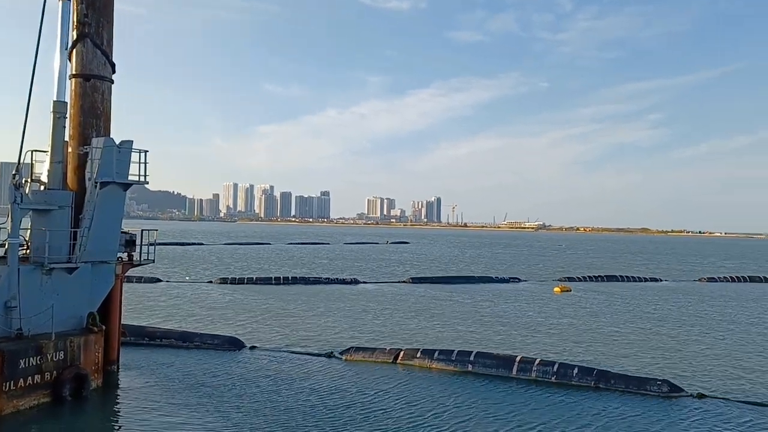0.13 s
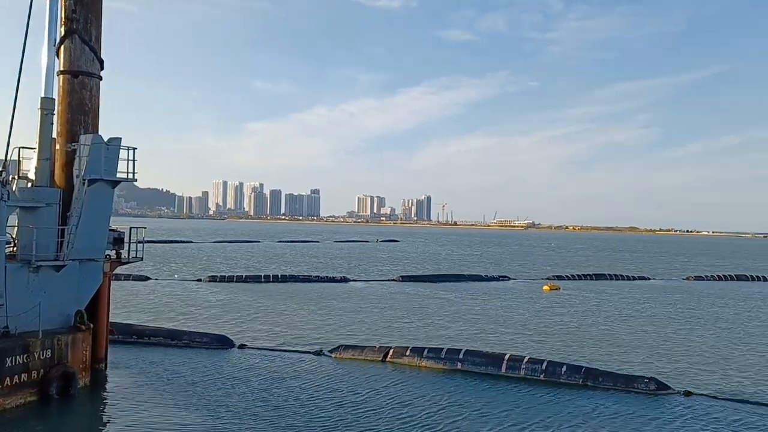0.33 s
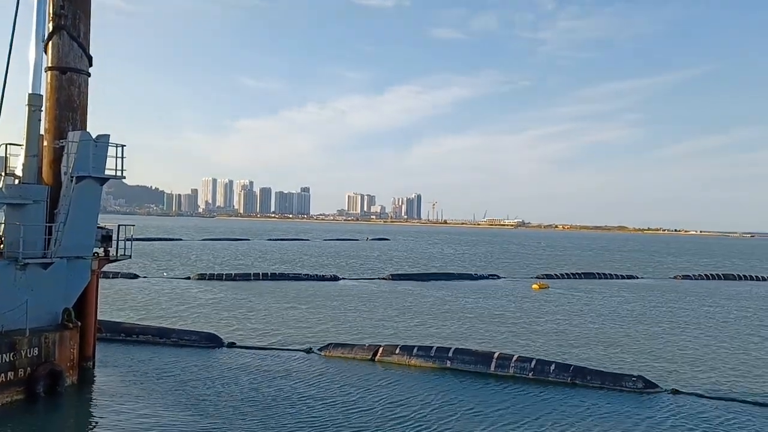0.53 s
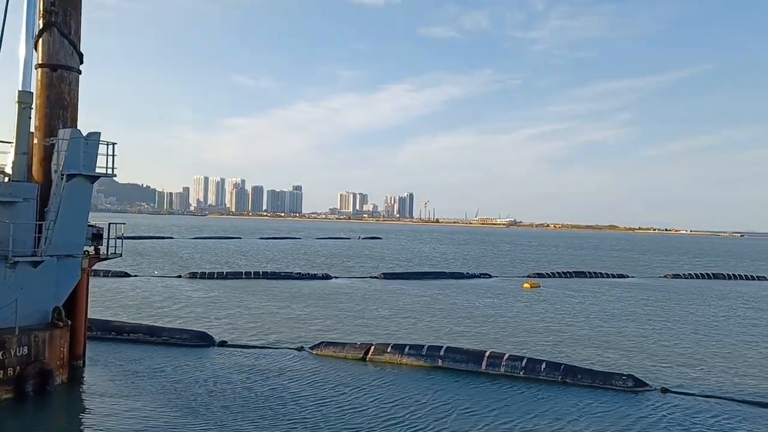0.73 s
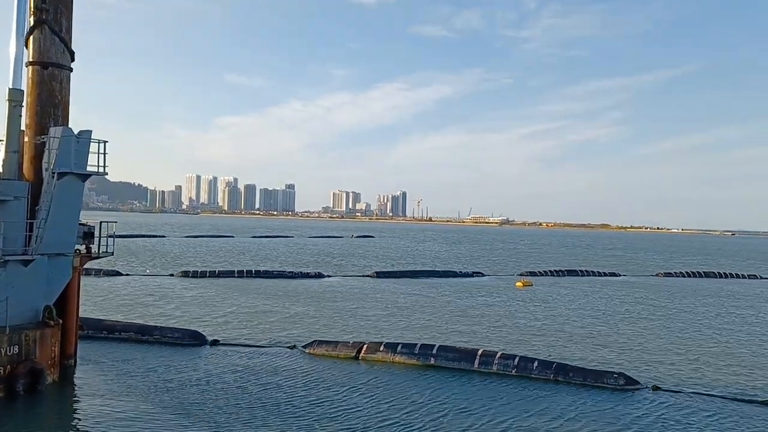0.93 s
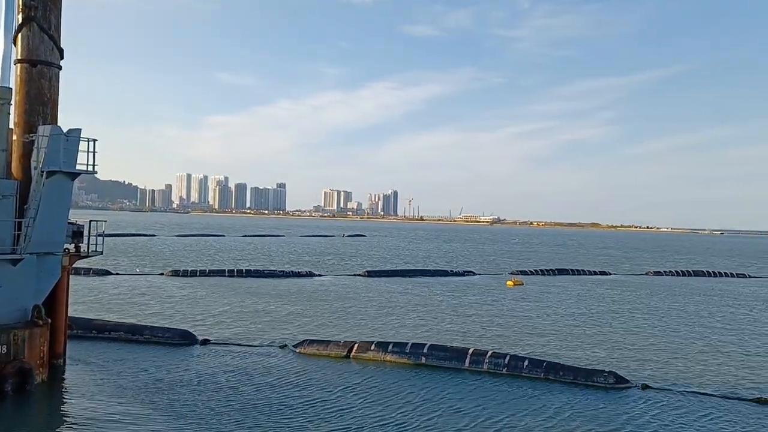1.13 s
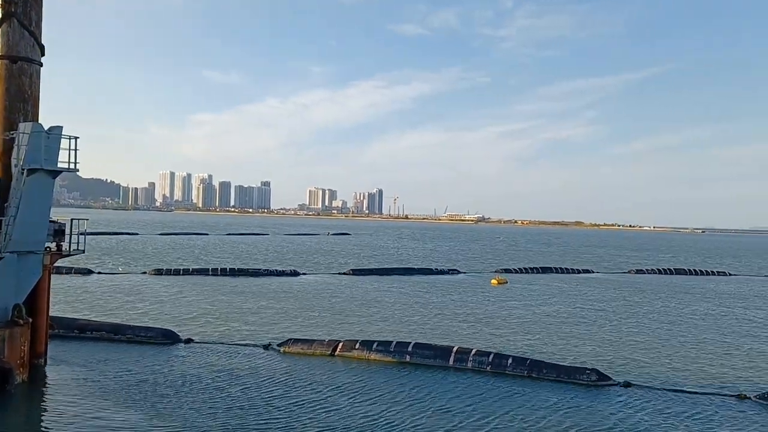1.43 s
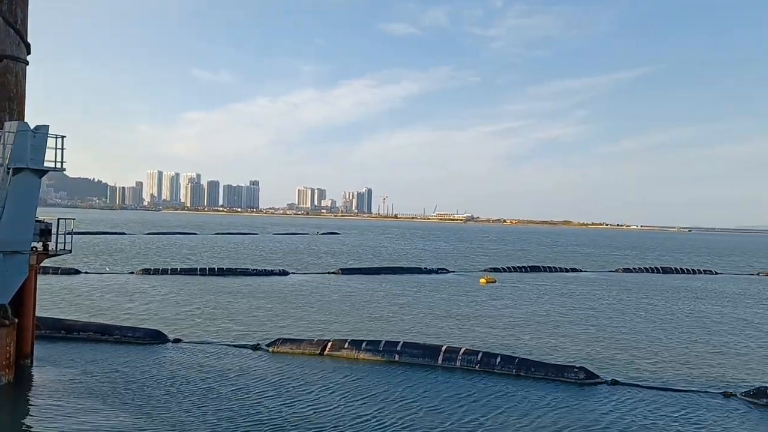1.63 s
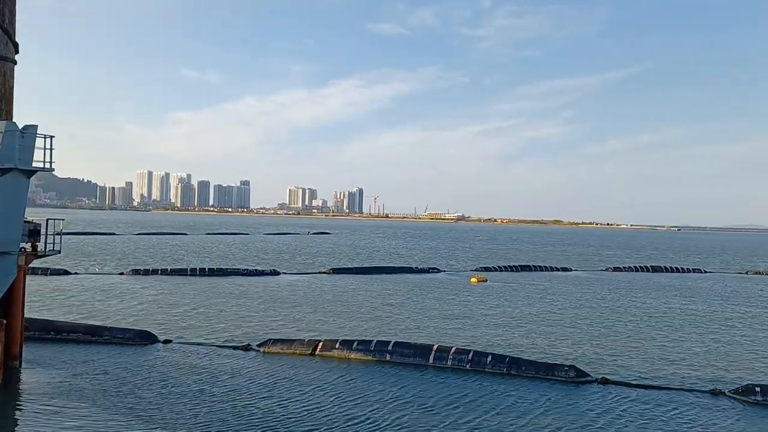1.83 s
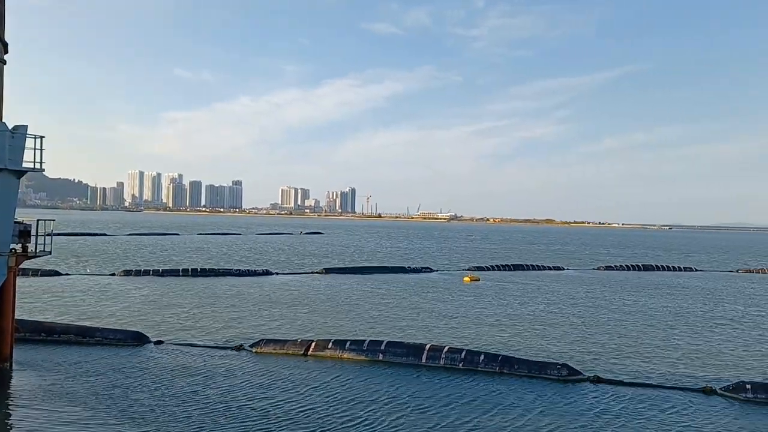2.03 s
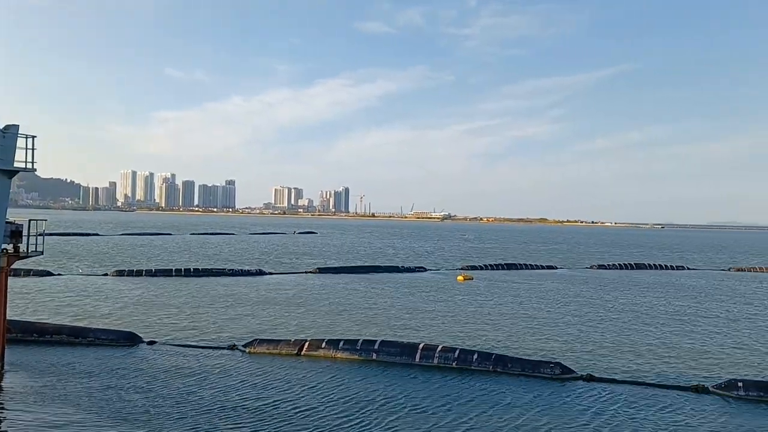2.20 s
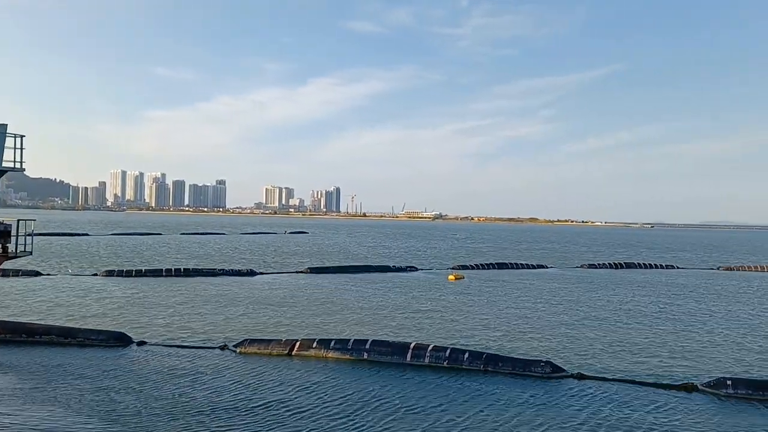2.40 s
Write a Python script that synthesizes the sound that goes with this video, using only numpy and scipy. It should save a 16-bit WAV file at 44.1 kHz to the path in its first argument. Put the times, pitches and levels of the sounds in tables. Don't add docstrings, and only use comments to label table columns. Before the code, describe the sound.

Deep diesel rumble from a dredging vessel runs throughout, with steady pump hums, dull hull drone and soft fan roar; faint water slaps and light wind buffeting join outdoors as the stereo microphone turns away and it fades.

```python
import sys
import numpy as np
from scipy import signal
from scipy.fft import rfft, irfft, next_fast_len
from scipy.io import wavfile
from scipy.ndimage import uniform_filter1d, map_coordinates

SR = 44100
rng = np.random.default_rng(int(sys.argv[2]) if len(sys.argv) > 2 else 0)


def persist_wave(psi):
    counts = np.round(np.clip(psi, -1, 1) * 32767).astype(np.int16)
    wavfile.write(sys.argv[1], SR, np.atleast_2d(counts).T)


def undo_db(level):
    steps = np.asarray(level, float) / 20
    return 10 ** steps


N = 112896
TIME_S = np.arange(N) / SR

# time in seconds, loudness in dB, extra bass in dB.
TURNING = [(0, 0.5, 3.5), (.12, -.5, -1), (.28, -0.5, -6), (.39, -1, -2), (.56, -1.5, -5), (.75, -2, -1),
           (.88, -2, -5), (1, -2, 0.5), (1.25, -3.5, -1), (1.38, -4, -2), (1.62, -4.5, -1),
           (1.75, -4.5, -4.5), (1.91, -6, -3.5), (1.95, -6.5, -7.5), (2.15, -7, -8.5), (2.19, -6.5, 2),
           (2.38, -7, -2.5), (2.56, -8, 3)]
# frequency in Hz, left minus right in dB.
LEAN = [(60, 0), (200, 0.5), (700, -0.7), (2400, -2), (6000, 0.7), (15000, -2.5)]

# multiple of the shaft speed, level in dB rms.
LOW_ORDERS = [(5, -42.5), (6, -34), (15, -38), (16, -36)]
MID_ORDERS = [(12, -43), (17, -42.5), (20, -53.5), (21, -86), (32, -57), (34, -49.5), (36, -53.5),
              (39, -53.5), (41, -54), (46, -60), (55, -78), (56, -96), (57, -102), (60, -77), (65, -57.5),
              (66, -56.5)]
HIGH_ORDERS = [(69, -61), (70, -78), (72, -54), (73, -60), (75, -81), (102, -79), (113, -82), (118, -64),
               (119, -58), (121, -58), (126, -93), (153, -73)]
SHAFT_HZ, FIRST_FIRING_S = 14.131, 0.0392
UNSTEADY_DB, WANDER_RAD_PER_HZ = 1.5, 0.00057

# frequency in Hz, time of the first crest in seconds.
HUM_TIMING = [(74.27, .0045), (89.88, .0032), (160.03, .0005), (148.5, .0055), (320, .0021), (384.5, .0012),
              (643.35, .001)]
HUM_DB = [-37.5, -40.5, -33.5, -43, -43, -51, -53]
# time in seconds, lift in dB.
PUMP_LOAD = [(0, -4.5), (.3, -0.5), (.55, 0), (.72, 4.5), (.88, -7), (1.02, 3.5), (1.12, -2), (1.28, 0),
             (1.45, 2), (1.7, 2), (2, 1.5), (2.35, 1.5), (2.56, -1)]

# frequency in Hz, strength in dB per Hz.
RUMBLE_COLOUR = [(30, -25), (55, -11), (72, -1.5), (130, 3.5), (185, 0), (215, 3.5), (320, -1.5),
                 (600, -24)]
DRONE_COLOUR = [(200, -58), (360, -1), (420, 1), (520, -3), (700, -6), (1050, -9), (1300, -21), (3000, -57)]
ROAR_COLOUR = [(500, -42), (850, -4), (1100, -7), (1350, -3.5), (1680, -5), (2000, -6), (2650, -10.5),
               (3100, -14.5), (4500, -58)]
HISS_COLOUR = [(2000, -37), (3000, -3.5), (3900, 1.05), (4500, -1), (5600, -5.5), (6300, -8.5),
               (12300, -14), (15700, -18.5)]
FOAM_COLOUR = [(3000, -40), (6000, -8), (9000, -3), (13000, -2), (15700, -11)]
BUFFET_COLOUR = [(25, -6.5), (60, 2.5), (110, 9.5), (200, 6), (330, -5), (500, -36), (1000, -64)]
RUMBLE_DB, DRONE_DB, ROAR_DB, HISS_DB = -28.5, -37, -43, -52.5

# frequency in Hz, likeness from 0 to 1.
RUMBLE_ALIKE = [(60, 0.94), (300, 0.83), (700, 0.98), (1200, 1)]
DRONE_ALIKE = [(300, 1), (700, 0.54), (1200, 0.66)]
ROAR_ALIKE = [(900, 0.71), (1600, 0.55), (2000, 0.15), (2800, 0.23)]
HISS_ALIKE = [(3400, 0.45), (4600, 0.43), (8000, 0.05), (15000, 0.02)]

RUMBLE_LEAD_S, ROAR_LEAD_S, HISS_LEAD_S = 0.00017, 0.00053, 0.000618
ROAR_LEAD_FROM_HZ, HISS_LEAD_FROM_HZ = 380, 2040

DUCT_HZ, DUCT_WIDTH_HZ, DUCT_DB = 1648, 77, -60.5

# time in seconds, half length in seconds, change in dB.
LULLS = [
    (0.582, 0.033, -1),
    (0.947, .03, -2),
    (1.348, 0.027, -0.5),
    (1.987, 0.043, -2.5),
    (2.156, 0.06, -0.5),
]
# time in seconds, half length in seconds, level in dB.
SPRAY = [
    (.03, 0.099, -64),
    (.24, .1, -69),
    (.42, .04, -71),
    (.74, .05, -72),
    (1.293, .06, -64.5),
    (1.55, .08, -71),
    (2.025, 0.13, -67),
]
# time in seconds, lift in the stack in dB, lift in the pipe in dB.
SURGES = [(.05, -1, -2.5), (.105, 2, -3.5), (.19, 5, 4), (.245, 0.5, 7.5), (.28, -4.5, 2.5), (.31, 4, 3.5),
          (.372, 7.5, 2), (.41, -2.5, 2.5), (.46, 5.5, 1.5), (.52, -4, -1), (.57, 6, 0.5), (.62, 0, 5),
          (.68, 4.5, 0), (.75, 2, 4.5), (.83, 7.5, 4.5), (.875, -1, -3), (0.91, 1, 7), (.96, 2.5, 1),
          (1.03, 3, 0.5), (1.09, -4, 1.5), (1.17, 3.5, 2.5), (1.24, 8.5, 3.5), (1.32, 1, 6), (1.4, 0, 3),
          (1.45, 3, 4.5), (1.535, 5, 0.5), (1.6, 0, 0.5), (1.67, 0, 4), (1.73, 5, 1.5), (1.79, 3.5, 7),
          (1.85, 0, -6), (1.9, -5, 7), (1.98, 0, -4), (2.04, -9, 7.5), (2.11, 5, -0.5), (2.19, 3, 1),
          (2.24, 5, -1), (2.3, -0.5, 3), (2.37, 4, 1.5), (2.44, 1, 5), (2.52, -2, -0.5)]
SURGE_S = 0.029
DRONE_SHARE = 0.14
STACK_TOP_HZ = 142

# start in seconds, peak in dB, pitch of the hull plate in Hz.
THUMPS = [(.055, -22, 254), (0.102, -14.5, 195), (.24, -38, 260), (0.383, -23.5, 168), (.4, -16, 273),
          (0.619, -26.5, 196), (0.742, -33, 320), (.9, -22, 243), (1.409, -36, 294), (1.461, -40, 213),
          (1.749, -27, 290), (1.848, -26, 246), (1.89, -30, 241), (2.038, -27.5, 249), (2.228, -32.5, 220),
          (2.291, -32, 320), (2.44, -30, 264)]
THUMP_T60_S, THUMP_RISE_S = 0.054, 0.001

# time in seconds, pitch in Hz, half length in seconds, level in dB.
DRIPS = [
    (0.101, 13600, .008, -64),
    (0.11, 13700, .008, -66),
    (0.424, 2350, 0.01, -48),
    (0.536, 2120, 0.017, -47),
    (1.836, 1600, 0.0095, -49),
    (1.898, 1690, 0.0061, -48),
    (2.007, 2040, 0.0098, -50),
]
DRIP_RISE_HZ_PER_S = 6000

# time in seconds, half length in seconds, level in dB.
GUSTS = [
    (.3, 0.34, -39),
    (0.562, 0.34, -39),
    (1.297, 0.09, -36.5),
    (1.436, 0.1, -39),
    (1.833, 0.37, -37),
    (2.05, 0.16, -41),
    (2.246, 0.1, -40),
]


def unit(x):
    return x / np.sqrt(np.mean(x ** 2) + 1e-20)


def along(points, hz):
    f, v = np.transpose(points)
    return np.interp(np.log(hz + 1), np.log(f + 1), v)


def closed(points):
    return list(points) + [(2 * points[-1][0], -120)]


def wobble(rate):
    return map_coordinates(rng.standard_normal(400), [np.arange(N) * np.clip(rate, 0, 100) / SR])


def bell(middle_s, half_s):
    return np.exp(-((TIME_S - middle_s) / half_s) ** 2)


def filtered(x, response):
    m = next_fast_len(N + 8192)
    return irfft(rfft(x, m) * response(np.fft.rfftfreq(m, 1 / SR)), m)[..., :N]


def ports(pair, lead_s, from_hz=0):
    def shift(hz):
        return np.exp(1j * np.pi * np.maximum(hz - from_hz, 0) * lead_s * np.array([[1], [-1]]))
    return filtered(pair, shift)


def rush(colour, alike, patchy_db):
    z = signal.stft(rng.standard_normal((2, N)), nperseg=512)[2]
    patches = uniform_filter1d(rng.standard_normal(z.shape[1:]), size=5, axis=0)
    patches = uniform_filter1d(patches, size=10, axis=1)
    pair = signal.istft(z * undo_db(patchy_db * unit(patches)), nperseg=512)[1][:, :N]

    def spread(hz):
        angle = np.arccos(np.clip(along(alike, hz), -1, 1)) / 2
        return undo_db(along(closed(colour), hz)) * np.array([np.cos(angle), np.sin(angle)])

    mid, side = filtered(pair, spread)
    return unit(np.array([mid + side, mid - side]))


def tone(hz, db, crest_s):
    turns = 2 * np.pi * hz * (TIME_S - crest_s)
    level = np.sqrt(2) * undo_db(db + UNSTEADY_DB * wobble(2.934))
    return level * np.cos(turns + WANDER_RAD_PER_HZ * hz * wobble(2.78))


def firing():
    return np.cos(2 * np.pi * SHAFT_HZ * (TIME_S - FIRST_FIRING_S))


def diesel():
    low = sum(tone(k * SHAFT_HZ, db, FIRST_FIRING_S) for k, db in LOW_ORDERS)
    mid = sum(tone(k * SHAFT_HZ, db, rng.uniform()) for k, db in MID_ORDERS)
    high = sum(tone(k * SHAFT_HZ, db, rng.uniform()) for k, db in HIGH_ORDERS)
    return low + mid, high


def pumps():
    hums = [tone(hz, db, crest_s) for (hz, crest_s), db in zip(HUM_TIMING, HUM_DB)]
    load_db = np.interp(TIME_S, *np.transpose(PUMP_LOAD))
    return sum(hums[:2]) + undo_db(load_db) * sum(hums[2:])


def exhaust_rumble():
    level = undo_db(RUMBLE_DB + 0.15 * firing() + 0.6 * wobble(21))
    return level * rush(RUMBLE_COLOUR, RUMBLE_ALIKE, patchy_db=0.8)


def hull_drone():
    level = undo_db(DRONE_DB + 0.32 * firing() + 0.17 * wobble(10.15))
    return level * rush(DRONE_COLOUR, DRONE_ALIKE, patchy_db=2.43)


def fan_roar():
    level = undo_db(ROAR_DB + 0.3 * firing() + 0.7 * wobble(18))
    return level * rush(ROAR_COLOUR, ROAR_ALIKE, patchy_db=1.3)


def vent_hiss():
    return undo_db(HISS_DB + 0.5 * wobble(20)) * rush(HISS_COLOUR, HISS_ALIKE, patchy_db=0.9)


def duct():
    def peak(hz):
        return 1 / (1 + ((hz - DUCT_HZ) / DUCT_WIDTH_HZ * 2) ** 4)
    air = rush([(500, 0), (4000, 0)], ROAR_ALIKE, patchy_db=-0.5)
    return undo_db(DUCT_DB + 2.5 * wobble(8.6)) * unit(filtered(air, peak))


def foam():
    breaks = sum(undo_db(db) * bell(s, half_s) for s, half_s, db in SPRAY)
    return breaks * rush(FOAM_COLOUR, [(5000, 0.05)], patchy_db=1.5)


def surges():
    lift_db = sum(np.array(lifts)[:, None] * bell(s, SURGE_S) for s, *lifts in SURGES)
    return lift_db - lift_db.mean(axis=1, keepdims=True)


def thumps():
    start_s, db, hz = np.array(THUMPS).T[..., None]
    t = np.maximum(TIME_S - start_s, 0)
    level = undo_db(db - 60 * t / THUMP_T60_S) * (1 - np.exp(-t / THUMP_RISE_S))
    return -(level * np.sin(2 * np.pi * hz * t)).sum(axis=0)


def drips():
    total = np.zeros(N)
    for s, hz, half_s, db in DRIPS:
        t = TIME_S - s
        turns = (hz + DRIP_RISE_HZ_PER_S * t / 2) * t
        total += undo_db(db) * bell(s, half_s) * np.sin(2 * np.pi * turns)
    return total


def wind():
    blow = sum(undo_db(db) * bell(s, half_s) for s, half_s, db in GUSTS)
    lumps = undo_db(0.72 * np.array([wobble(13.45), wobble(23.9)]))
    return blow * unit(lumps * rush(BUFFET_COLOUR, [(30, 0.017)], patchy_db=3.5))


def scene():
    turn_s, loud_db, bass_db = np.transpose(TURNING)
    fade = undo_db(np.interp(TIME_S, turn_s, loud_db))
    swell = undo_db(np.interp(TIME_S, turn_s, bass_db))

    low, high = diesel()
    boom = low + pumps() + exhaust_rumble()
    stack = filtered(boom, lambda hz: 1 / (1 + (hz / STACK_TOP_HZ) ** 8))
    pipe = boom - stack
    stack_db, pipe_db = surges()
    gulped = undo_db(stack_db) * stack + undo_db(pipe_db) * pipe
    drone = undo_db(DRONE_SHARE * pipe_db) * hull_drone()
    bass = ports(swell * gulped + drone, RUMBLE_LEAD_S)

    treble = ports(high + fan_roar() + duct(), ROAR_LEAD_S, ROAR_LEAD_FROM_HZ)
    treble = treble + ports(vent_hiss(), HISS_LEAD_S, HISS_LEAD_FROM_HZ)
    carried = undo_db(sum(db * bell(s, half_s) for s, half_s, db in LULLS))
    machinery = fade * (bass + carried * treble)
    return machinery + foam() + thumps() + drips() + wind()


def low_pass(x):
    return signal.sosfilt(signal.butter(12, 15750, fs=SR, output="sos"), x)


def record(dry):
    leaned = filtered(dry, lambda hz: undo_db(along(LEAN, hz) / 2 * np.array([[1], [-1]])))
    return low_pass(leaned)


dry = scene()
out = record(dry)
persist_wave(out)
```